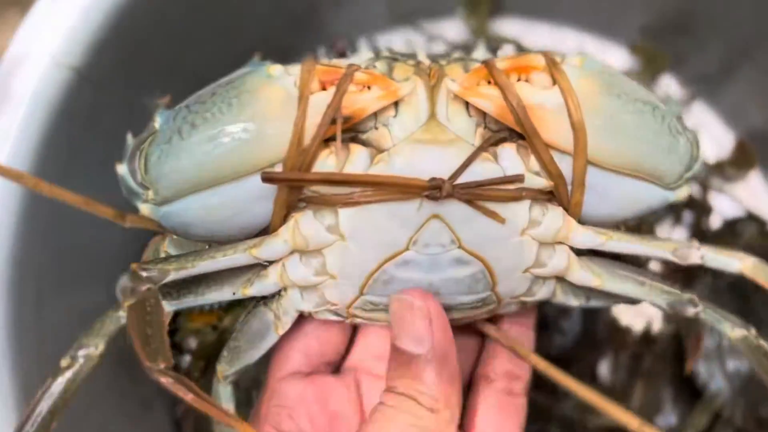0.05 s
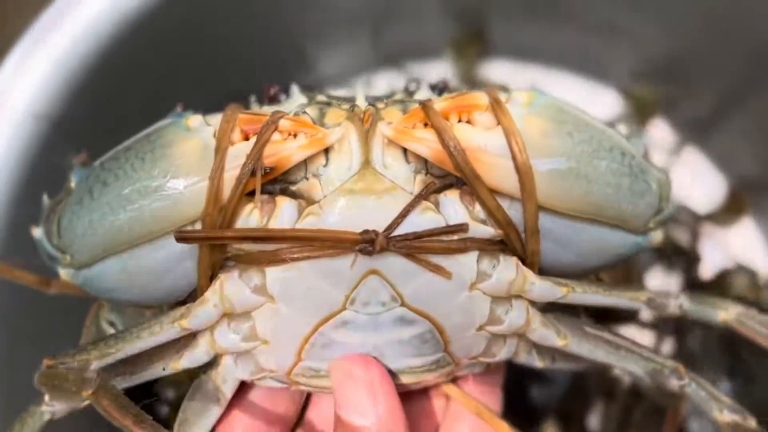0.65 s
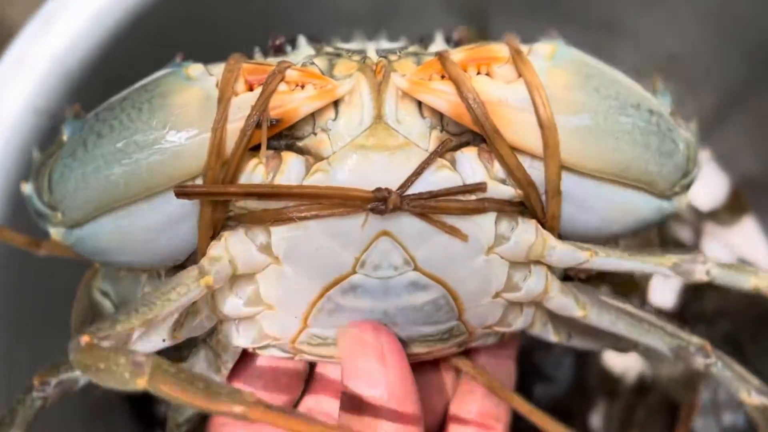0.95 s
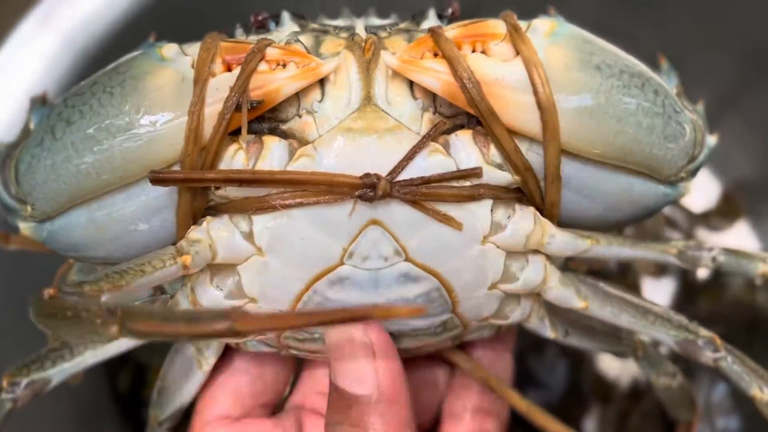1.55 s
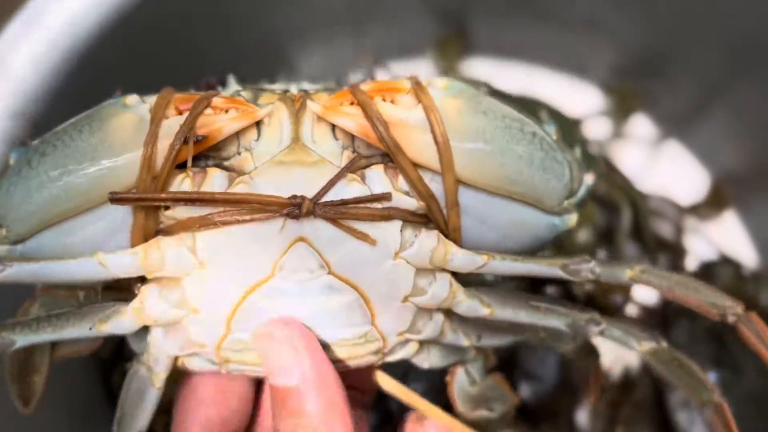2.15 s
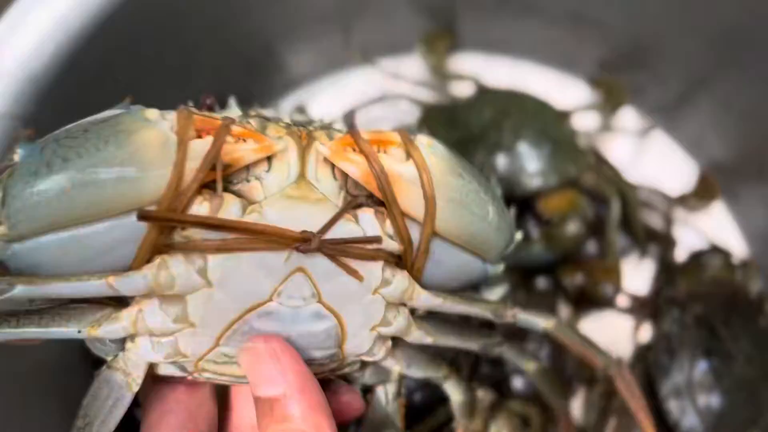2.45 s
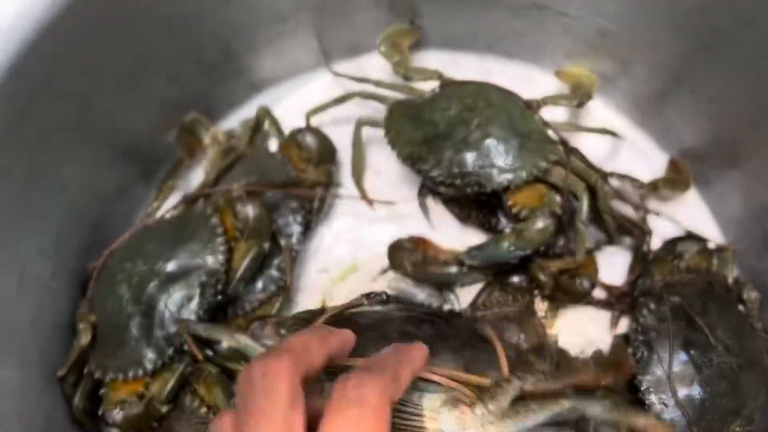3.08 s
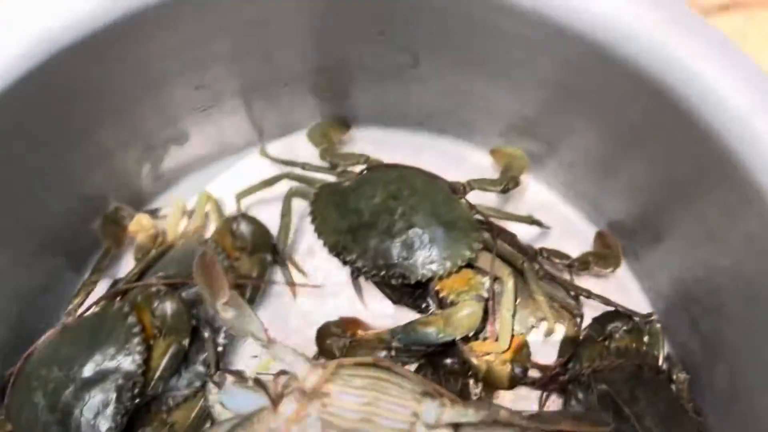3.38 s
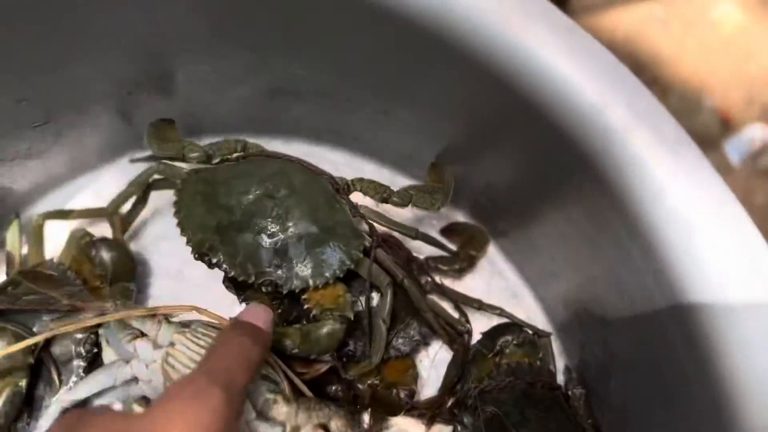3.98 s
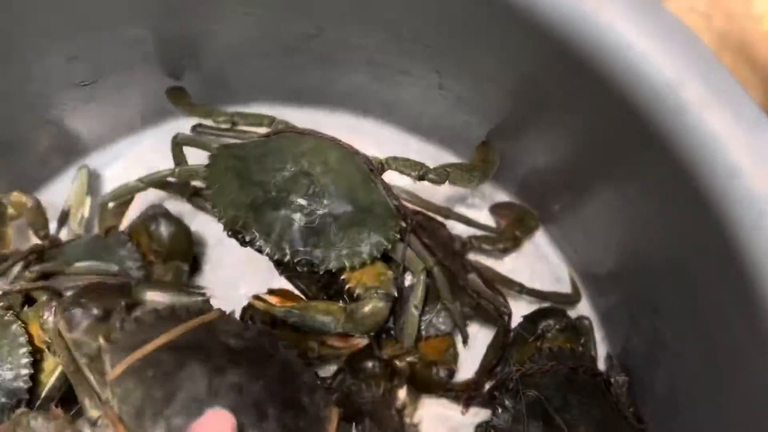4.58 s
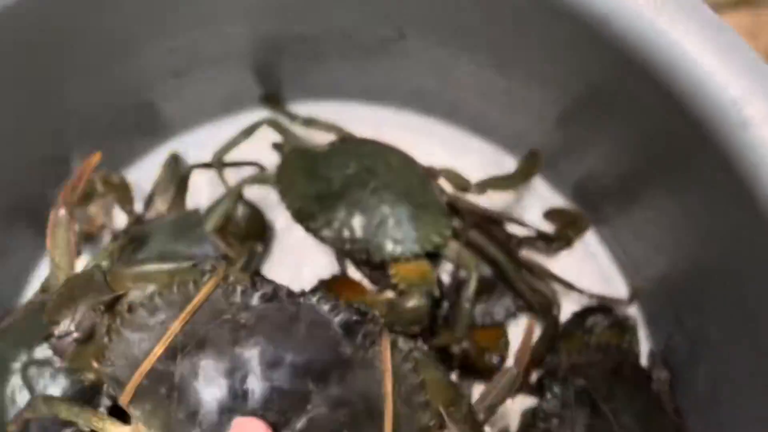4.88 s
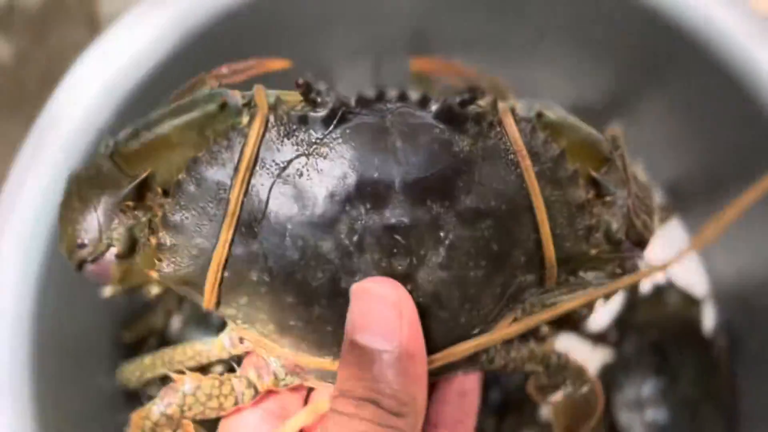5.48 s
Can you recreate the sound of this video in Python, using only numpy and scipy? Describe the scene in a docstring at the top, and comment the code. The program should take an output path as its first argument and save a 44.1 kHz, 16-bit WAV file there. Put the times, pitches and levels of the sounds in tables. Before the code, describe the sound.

Live crabs click, scrape and knock their shells together in a tub, with a few hollow bumps over a low outdoor rumble.

```python
"""A tied mud crab is held over a tub of live crabs, close to a microphone with two openings (ports).
From the start, wet legs rustle over a low outdoor rumble, and shells click and knock now and then.
About three seconds in, the crab is set down among the others: the floor thuds, shells clatter
and the hollow of the tub booms at each bump. Then another crab is lifted out, with more clicks
and knocks and with claws scraping the ringing wall."""
import sys
import numpy as np
from scipy import signal
from scipy.fft import rfft, irfft
from scipy.io import wavfile
from scipy.ndimage import uniform_filter1d

SR = 44100
rng = np.random.default_rng(int(sys.argv[2]) if len(sys.argv) > 2 else 0)


def put_to_file(sound):
    """Save the sound as 16-bit audio at rate SR, in the file named by the first command-line argument."""
    columns = np.atleast_2d(sound).T  # one column per channel
    safe = np.clip(columns, -1, 1)
    whole_steps = np.round(safe * 32767)
    wavfile.write(sys.argv[1], SR, whole_steps.astype(np.int16))


N = 252693

# how restless the legs are: (time [s], relative crackle level [dB], relative shuffle level [dB])
RESTLESSNESS = [(0.0, -48, -44), (0.06, -61, -47), (0.85, -55.5, -54), (1.4, -64, -55.5),
                (1.61, -57.5, -53), (1.79, -64.5, -53), (2.3, -58, -50), (2.62, -60, -50.5),
                (2.9, -43.5, -43.5), (3.05, -53.5, -47), (3.27, -48, -46), (3.38, -44.5, -43),
                (3.57, -53, -43.5), (3.88, -55, -48.5), (4.21, -55, -46.5), (4.34, -50.5, -47),
                (4.93, -45.5, -47.5), (5.12, -49.5, -52), (5.17, -57, -46), (5.73, -58.5, -49.5)]
# tone of a dull rub: (frequency [Hz], gain [dB])
SHUFFLE_TONE = [(200, -4), (400, 3), (900, 1), (1400, -2), (1800, -13.5), (3500, -24.5)]
FILTER_HZ = abs(np.fft.fftfreq(2048, 1 / SR))


def amp(db):
    """Turns decibels into a gain; amp(-60 * t / t60) fades by 60 dB in t60 seconds."""
    return 10 ** (np.asarray(db) / 20)


def unit_level(x):
    """Scales a signal to an average power of one."""
    return x / np.sqrt(np.mean(x ** 2) + 1e-20)


def curve(points, hz=FILTER_HZ):
    """Joins (frequency, value) points into a curve along a pitch scale."""
    point_hz, value = np.transpose(points)
    return np.interp(np.log(hz + 1), np.log(point_hz + 1), value)


def add(mix, start_s, sound):
    """Mixes a sound in at the given time."""
    part = mix[..., max(round(start_s * SR), 0):][..., :sound.shape[-1]]
    part += sound[..., :part.shape[-1]]


def set_peak(x, db, size=176):
    """Scales a hit so that its loudest few milliseconds have the given level."""
    return x * amp(db) / np.sqrt(uniform_filter1d(x ** 2, size).max() + 1e-20)


def shaped(x, db):
    """Filters a sound by a gain in dB at each of FILTER_HZ, with no ringing ahead of a hit."""
    taps = np.fft.ifft(np.exp(np.conj(signal.hilbert(np.log(amp(db)))))).real
    return signal.fftconvolve(x, taps[:len(taps) // 2])[:len(x)]


def tilted(points, db_per_octave, pivot_hz=4000):
    """Harder, smaller contacts tip a tone curve towards the treble."""
    return curve(points) + db_per_octave * np.clip(np.log2((FILTER_HZ + 1) / pivot_hz), -1.6, 1.6)


def resonance(hz, octaves, db, at_hz=FILTER_HZ + 1):
    """A rounded peak in dB around a pitch at which something rings."""
    return db * np.exp(-.5 * (np.log2(at_hz / hz) / octaves) ** 2)


def slips(count, per_s, spread_db):
    """A random train of tiny contacts, a few much larger than the rest."""
    sizes = amp(spread_db * np.minimum(rng.exponential(1, count), 4)) * rng.choice([-1, 1], count)
    return unit_level(sizes * (rng.random(count) < per_s / SR))


def pressure(count, depth_db, size=500):
    """Uneven pressure: a gain that wanders, more slowly for a larger size."""
    drift = uniform_filter1d(uniform_filter1d(rng.standard_normal(count), size), size)
    return amp(depth_db * unit_level(drift))


def strays(per_s, over_db, column, spread_db=1):
    """Chance touches, as strong as the legs are restless: (time [s], level [dB], size [-1 to 1])."""
    jitter, strength, size = rng.random((80, 3)).T
    legs = np.transpose(RESTLESSNESS)
    times = (np.arange(len(jitter)) + jitter) / per_s
    db = np.interp(times, legs[0], legs[column]) + over_db + spread_db * (2 * strength - 1)
    return np.transpose([times, db, 2 * size - 1])[times < N / SR]


def ports(x):
    """Sound reaches the left and right ports with slightly different timing and level."""
    # how far the left wave runs ahead: (frequency [Hz], phase lead [radians])
    left_lead = [(20, 0), (200, -.3), (350, -.6), (650, -1.3), (1000, -.8), (1400, -.8), (2500, 2.0),
                 (4100, 1.5), (5250, 2.0), (6100, 3.2), (7700, 6.0), (8800, 6.8), (10300, 9.4),
                 (11800, 12.2), (13400, 12.9), (14600, 15.7)]
    # how much louder the left is: (frequency [Hz], left minus right [dB])
    balance = [(150, 0), (350, -.8), (600, -3.2), (1100, -.8), (2300, .6), (4400, -1.6), (8000, 0)]
    hz = np.fft.rfftfreq(N, 1 / SR)
    radians = np.interp(hz, *np.transpose(left_lead))
    left = np.exp(.5j * radians) * amp(curve(balance, hz) / 2)
    return irfft(rfft(x) * np.array([left, 1 / left]), N)


def outdoors(level_db=-42):
    """Steady low rumble with a faint hiss; above the bass some of it comes from all sides."""
    # tone of the background rumble and hiss: (frequency [Hz], gain [dB])
    background_tone = [(12, -38), (20, -65), (42, -1), (87, -0.5), (124, -5.5), (620, -22), (796, -25),
                       (966, -30.5), (1170, -32), (5090, -32.5), (6010, -51), (8620, -38.5), (10200, -68),
                       (13400, -42.5), (15000, -60)]
    hz = np.fft.rfftfreq(N, 1 / SR)
    tone = amp(curve(background_tone, hz) - curve([(400, 1.04), (2000, 1.28)], hz))
    noise = rfft(rng.standard_normal((3, N))) * unit_level(tone) * amp(level_db)
    all_sides = amp(curve([(70, -26), (200, -13), (500, -5), (4000, -7)], hz))
    return ports(irfft(noise[0], N)) + irfft(noise[1:] * all_sides, N)


def wall_echoes(x, t60=.04):
    """Short echoes off the round wall, different at each port and strongest in the middle range."""
    t = np.arange(SR // 8) / SR
    tone = curve([(200, -24), (380, -13), (600, -4), (1200, -9), (2500, -6), (5000, -7), (9000, -13)])
    echoes = np.array([slips(len(t), 3000, 1) for _ in range(2)]) * amp(-60 * t / t60) * (t > .001)
    echoes = np.array([shaped(side / np.linalg.norm(side), tone) for side in echoes])
    return signal.fftconvolve(x[None], echoes, axes=1)[:, :N]


def leg_rustle(crackle_gain_db=3, shuffle_gain_db=-1.5):
    """Many wet legs slide over each other in uneven little bursts."""
    # tone of the wet crackle: (frequency [Hz], gain [dB])
    crackle_tone = [(700, 2), (1700, -2.5), (2150, 6), (3200, 4), (4800, 3), (6500, -1.5), (9000, -9),
                    (13000, -9.5), (16000, -28)]
    times, crackle_db, shuffle_db = np.transpose(RESTLESSNESS)
    t = np.arange(N) / SR
    crackle = shaped(slips(N, 2200, 1.95) * pressure(N, 2.6), curve(crackle_tone))
    shuffle = shaped(slips(N, 1500, 2.44) * pressure(N, 3.33), curve(SHUFFLE_TONE))
    return (unit_level(crackle) * amp(np.interp(t, times, crackle_db) + crackle_gain_db)
            + unit_level(shuffle) * amp(np.interp(t, times, shuffle_db) + shuffle_gain_db))


def wall_ring(x, place_hz=1990, boost_db=0):
    """The thin wall rings at many close pitches; the place touched can boost those near place_hz."""
    # the wall's own notes: (pitch [Hz], relative level [dB], fade time [s])
    wall_notes = [(1990, -3.5, 0.24), (2080, -4.5, 0.19), (2184, 1, 0.091), (2212, -1, 0.15),
                  (2342, -8, 0.07), (2660, -6, 0.092), (3100, -10, 0.068), (3150, -11, 0.081),
                  (3622, -14, 0.16), (3980, -10, 0.08), (4270, -10, 0.06), (4490, -9, 0.066),
                  (5100, -8, 0.1)]
    t = np.arange(SR // 5) / SR
    ring = np.zeros((2, len(t)))
    for hz, db, t60 in wall_notes:
        fade = amp(db + resonance(place_hz, .15, boost_db, at_hz=hz) - 60 * t / t60)
        port_phase = rng.normal(0, .19, (2, 1))
        ring += fade * np.sin(2 * np.pi * (hz * t + port_phase))
    return signal.fftconvolve(x[None], ring / np.linalg.norm(ring[0]), axes=1)


def claw_scrapes(gain_db=-2):
    """Claw tips stick and slip in swelling strokes: returns their grit and the wall's rasping ring."""
    # claws and shells dragged along the wall and each other: (middle time [s], length [s],
    # relative grit level [dB], brightness [dB per octave], wall level [dB], favoured pitch [Hz])
    strokes = [(0.011, 0.027, -48, -7, -45.5, 2130), (0.41, 0.16, -46.5, 13.5, -71, 2100),
               (0.727, 0.033, -37, 11, -46.5, 2070), (0.819, 0.18, -47.5, 12.5, -53.5, 4400),
               (1.144, 0.06, -48, -19, -56, 2100), (1.534, 0.088, -42.5, 1, -65, 4400),
               (1.653, 0.17, -48.5, 11, -56.5, 2100), (2.153, 0.25, -47.5, 7.5, -55.5, 2200),
               (2.753, 0.1, -40, 5, -41, 3100), (2.852, 0.1, -40.5, -1, -41, 2190),
               (2.93, .13, -38, 9, -36.5, 2170), (3.116, 0.043, -34.5, 7, -42, 2100),
               (3.187, 0.059, -33, 6, -28.5, 2100), (3.33, 0.058, -32.5, 7, -46, 2000),
               (3.381, .04, -36, 2, -46, 2130), (4.286, 0.046, -41, -5, -31, 2650),
               (4.36, 0.03, -36, 6, -33, 2170), (4.38, 0.065, -46, 15, -38, 2230),
               (4.479, 0.042, -31, 17, -53, 2110), (4.585, 0.04, -49, 0, -43, 2060),
               (4.719, 0.23, -43, 8.5, -52, 2100), (4.87, 0.07, -31, 6, -27, 2000),
               (4.985, 0.12, -29.5, 3, -34, 3230), (5.014, 0.09, -37, 0, -34.5, 2090),
               (5.359, 0.031, -46.5, 6, -47, 2070), (5.505, 0.19, -42, 9, -51, 2130)]
    # tone of the grit: (frequency [Hz], gain [dB])
    grit_tone = [(400, -16), (1300, -1), (1800, -11), (2050, 7.5), (2600, 6.5), (3300, 4), (4700, 5.5),
                 (6500, -7), (9000, -13.5), (15000, -28)]
    grits, rasps = np.zeros(N), np.zeros((2, N))
    count = SR // 3
    for middle, length, db, bright, wall_db, place_hz in strokes:
        friction = slips(count, per_s=750, spread_db=3.4) * pressure(count, 1.3)
        friction = (friction * pressure(count, 3, size=50))[:int(length * SR)]
        swell = np.hanning(len(friction))
        claw_hz = 3600 * 2 ** (.3 * (np.arange(5) + rng.random(5)))
        claw_ring = sum(resonance(hz, .02, db=5) for hz in claw_hz)
        grit = unit_level(shaped(friction, tilted(grit_tone, bright) + claw_ring))
        rasp = wall_ring(friction * swell, place_hz, boost_db=8)
        add(grits, middle - length / 2, amp(db + gain_db) * swell * grit)
        add(rasps, middle - length / 2, set_peak(rasp, wall_db, size=600))
    return grits, rasps


def floor_thud(start=3.144, hz=66, t60=.11, rise_s=.0016, lowest_hz=48):
    """The floor flexes once under the crab's weight; it is too small to give off the deepest bass."""
    out, t = np.zeros(N), np.arange(SR // 3) / SR
    flex = amp(-12 - 60 * t / t60) * np.sin(2 * np.pi * hz * t) * (1 - np.exp(-t / rise_s))
    add(out, start, signal.lfilter(*signal.butter(2, lowest_hz, "high", fs=SR), flex))
    return out


def hollow_booms(gain_db=1, settle_s=.0047, linger_hz=318, linger_t60=.16):
    """Bumps ring the hollow and rub shell on the floor; the pitch settles and a low note lingers."""
    # bumps against the tub: (time [s], relative level [dB], pitch [Hz])
    bumps = [(0.366, -48, 496), (1.144, -46, 518), (3.135, -13.5, 346), (3.228, -16.5, 335),
             (3.304, -32.5, 326), (3.321, -29.5, 358), (3.355, -22.5, 326), (3.374, -25.5, 332),
             (3.385, -26.5, 381), (3.402, -31.5, 330), (3.422, -26, 339), (3.439, -28.5, 346),
             (3.484, -24.5, 333), (3.517, -25, 393), (3.537, -16, 454), (3.55, -24, 357),
             (3.774, -36.5, 499), (4.05, -36, 505), (4.18, -34, 332), (4.239, -28, 340),
             (4.254, -26.5, 326), (5.064, -38, 331), (5.195, -39.5, 345), (5.268, -38.5, 492),
             (5.3, -41, 328)]
    out, t = np.zeros(N), np.arange(SR // 6) / SR
    hardest_db = max(row[1] for row in bumps)
    linger = np.sin(2 * np.pi * linger_hz * t) * amp(-28 - 60 * t / linger_t60)
    for start, db, hz in bumps:
        force = amp(db - hardest_db)
        t60 = np.interp(force, [0, 1], [.048, .027])  # the crab's weight damps the hardest bumps
        rise_s = np.interp(force, [0, 1], [.027, .0086])
        swell = 1 - np.exp(-t / rise_s)
        cycles = np.cumsum(hz * (.954 + .184 * np.exp(-t / settle_s))) / SR
        rub = unit_level(shaped(slips(len(t), 1900, 2.5), curve(SHUFFLE_TONE)))
        note = np.sin(2 * np.pi * cycles) * pressure(len(t), 2, size=90)
        boom = (note + amp(-14) * np.sqrt(force) * rub) * amp(-60 * t / t60)
        add(out, start, set_peak(swell * (boom + linger), db + gain_db))
    return out


def body_knocks(gain_db=-2, rise_s=.00082, clean_tap_s=.021):
    """A body lands with a blow and a clatter of legs; gentle landings are rounder and duller."""
    # bodies hitting each other and the tub: (time [s], relative level [dB], pitch [Hz], fade time [s])
    landings = [(0.222, -32.5, 1420, 0.035), (0.529, -36.5, 1280, 0.055), (1.473, -42.5, 1360, .04),
                (1.678, -38.5, 1320, 0.049), (1.709, -42, 1390, 0.035), (2.77, -39.5, 890, 0.077),
                (2.812, -36, 1240, 0.12), (2.841, -33, 1580, 0.12), (2.872, -34.5, 1350, 0.091),
                (2.896, -32, 1400, .09), (2.944, -36, 1300, 0.065), (3.123, -22.5, 1410, 0.11),
                (3.1342, -10, 1350, 0.05), (3.227, -30, 1120, 0.037), (3.318, -32, 1020, 0.046),
                (3.329, -31, 1100, 0.04), (3.359, -33, 1000, 0.07), (3.378, -28.5, 1000, 0.063),
                (3.421, -42, 950, 0.13), (3.464, -28, 1120, 0.054), (3.512, -24, 950, 0.067),
                (3.537, -12.5, 900, 0.05), (3.549, -19, 770, 0.045), (3.564, -22.5, 1020, 0.055),
                (3.712, -39.5, 740, 0.037), (3.768, -37.5, 1000, 0.08), (4.181, -35.5, 1460, 0.047),
                (4.472, -36.5, 1060, 0.076), (4.575, -35.5, 1040, 0.028), (4.62, -39, 1040, 0.037),
                (4.669, -35.5, 1100, .06), (4.979, -36, 1190, 0.039), (5.04, -38, 1110, .04),
                (5.063, -33, 910, 0.053), (5.1, -36.5, 1120, 0.12), (5.116, -33.5, 900, 0.068),
                (5.134, -28, 1280, 0.016), (5.195, -41, 950, 0.1), (5.261, -34.5, 860, 0.12),
                (5.293, -31, 814, 0.07), (5.613, -37.5, 840, 0.089)]
    # tone of a knock: (frequency [Hz], gain [dB])
    knock_tone = [(150, -35.5), (330, -2), (650, 3.5), (800, 1.5), (1150, 1), (1530, 2.5), (1700, -8.5),
                  (1950, -1), (3500, -18), (8000, -22)]
    out, t = np.zeros(N), np.arange(SR // 5) / SR
    hardest_db = max(row[1] for row in landings)
    light_knocks = [(start, db, 1120 * 2 ** (-.43 * size), .028)
                    for start, db, size in strays(per_s=4.4, over_db=-7, column=2)]
    for start, db, hz, t60 in list(landings) + light_knocks:
        force = amp((db - hardest_db) / 2)
        clatter = slips(len(t), 6000, 1.2) * amp(-60 * t / t60) * (1 - np.exp(-t / rise_s))
        blow = clean_tap_s / t60 * (t == 0)  # the shorter the clatter, the more the blow stands out
        contact = clatter / np.linalg.norm(clatter) + blow
        ring = resonance(hz, .15, db=12 - 10 * force)
        treble_cut = 24 * (1 - force) * np.clip(np.log2((FILTER_HZ + 1) / (1.18 * hz)), 0, 1)
        knock = shaped(contact, curve(knock_tone) + ring - treble_cut)
        add(out, start, set_peak(knock, db + gain_db))
    return out


def shell_clicks(gain_db=1, snap_t60=.019, rise_s=.00015, contacts_per_s=12000, chatter_top_hz=4500):
    """Shell hits shell: a dry snap and a brief, duller chatter ring a few notes of the piece struck."""
    # sharp hits: (time [s], relative level [dB], brightness [dB per octave], chatter fade time [s])
    hits = [(0.207, -43, -4, 0.11), (0.2558, -39.5, 0, .1), (0.368, -45.5, -1, .1), (0.7194, -26.5, 8, .05),
            (0.8548, -31.5, 3.5, .04), (0.887, -43, -21, 0.065), (0.962, -44, 11, .04),
            (1.4331, -38.5, 3, .08), (1.7376, -22, 5, 0.046), (2.0258, -32.5, 3.5, 0.15),
            (2.668, -42.5, 0.5, .06), (2.7684, -37.5, 20, .03), (2.8105, -34.5, -5, .06),
            (2.8404, -31, -1, 0.043), (2.8734, -38, 11, .05), (2.8984, -27, -1, 0.076),
            (2.9173, -29.5, 4, .06), (2.9434, -33, 6, .08), (2.9916, -25, 1.5, .06),
            (3.0004, -29, 6, 0.055), (3.024, -36, 3, .05), (3.1328, -15.5, 3, 0.088),
            (3.2235, -25.5, 9, .035), (3.2715, -25, 3.5, .03), (3.3154, -24.5, 0.5, .06),
            (3.3304, -25, 2, 0.071), (3.5089, -30.5, -1, 0.27), (3.5364, -23.5, 0, 0.11),
            (3.5474, -25, 1, 0.18), (3.7698, -32.5, 0.5, 0.11), (3.868, -42.5, 10, 0.063),
            (3.91, -38.5, 5.5, .06), (4.0218, -36, 1.5, 0.059), (4.1794, -33.5, 10, 0.045),
            (4.2004, -30, -1.5, 0.11), (4.2762, -12.5, 0.5, 0.088), (4.388, -36.5, 5, .05),
            (4.4712, -26.5, 1, 0.061), (4.4804, -27, 5, .05), (4.9546, -33, 2, 0.088),
            (5.0474, -35.5, 3, .07)]
    # tone of a click: (frequency [Hz], gain [dB])
    click_tone = [(500, -24), (1700, -1.5), (2100, 9.5), (3200, 6.5), (3900, 5), (4900, 11.5), (6200, 6),
                  (9000, 1), (13000, -8.5), (16000, 1)]
    out, t = np.zeros(N), np.arange(SR // 6) / SR
    lowpass = signal.butter(2, chatter_top_hz, fs=SR)
    light_clicks = [(start, db, -4 * size, .073)
                    for start, db, size in strays(per_s=2.4, over_db=7.5, column=1)]
    for start, db, bright, t60 in list(hits) + light_clicks:
        snap = slips(len(t), contacts_per_s, .45) * amp(8 - 60 * t / snap_t60)
        chatter = signal.lfilter(*lowpass, slips(len(t), contacts_per_s, 2)) * amp(-60 * t / t60)
        contact = (snap + chatter) * (1 - np.exp(-t / rise_s))
        lowest_hz = 1950 * 2 ** (np.clip(bright, 0, 4.6) / 4)  # a small, bright piece has no low notes
        shell_hz = lowest_hz * 2 ** (.45 * (np.arange(4) + rng.random(4)))
        ring = sum(resonance(hz, .025, db=7) for hz in shell_hz)
        low_cut = 14 * np.clip(2 * np.log2(lowest_hz / (FILTER_HZ + 1)), 0, 1) * (bright > 0)
        click = shaped(contact, tilted(click_tone, bright) + ring - low_cut)
        add(out, start, set_peak(click, db + gain_db))
    return out


def scene(click_ring_db=-19):
    """Everything in the tub, the wall that it sets ringing, its echoes and the background rumble."""
    clicks = shell_clicks()
    grit, rasp = claw_scrapes()
    tub = clicks + grit + body_knocks() + hollow_booms() + floor_thud() + leg_rustle()
    wall = rasp + amp(click_ring_db) * wall_ring(clicks)[:, :N]
    return ports(tub + wall) + wall_echoes(tub) + outdoors()


def record(dry):
    """Cuts away the very highest treble, above 16300 Hz."""
    lowpass = signal.firwin(511, 16300, window=("kaiser", 9), fs=SR)
    return signal.oaconvolve(dry, lowpass[None], "same")


dry = scene()
out = record(dry)
put_to_file(out)
```